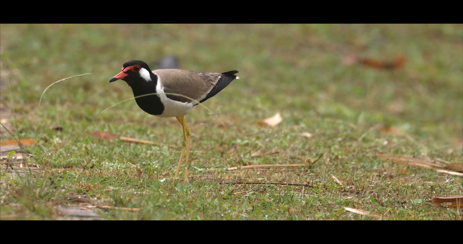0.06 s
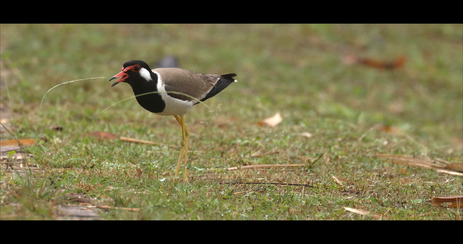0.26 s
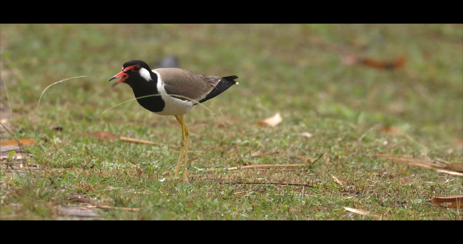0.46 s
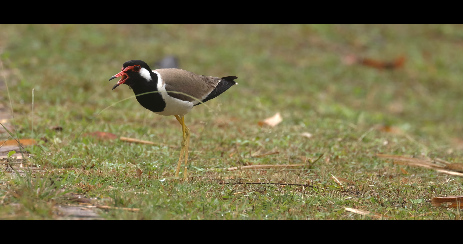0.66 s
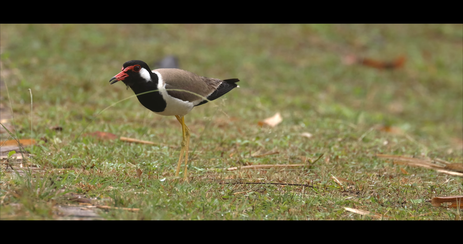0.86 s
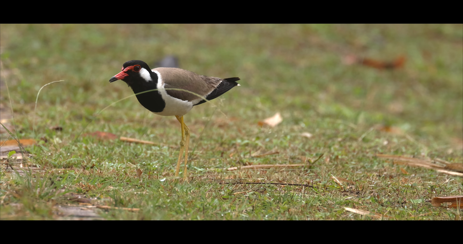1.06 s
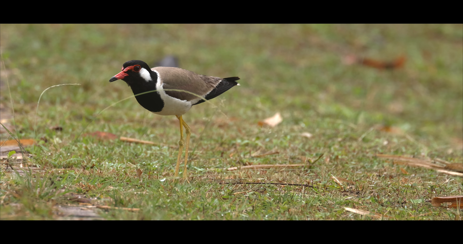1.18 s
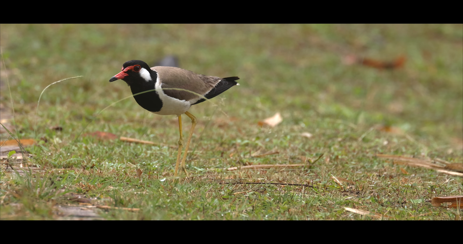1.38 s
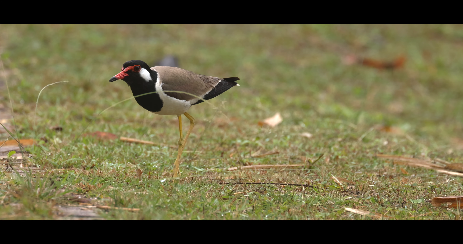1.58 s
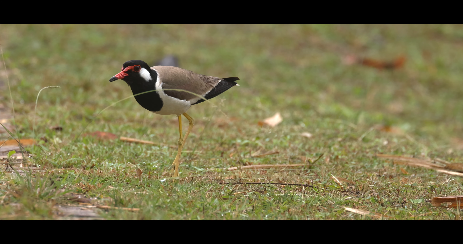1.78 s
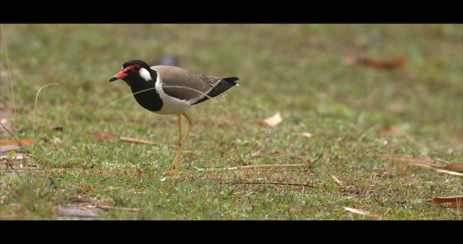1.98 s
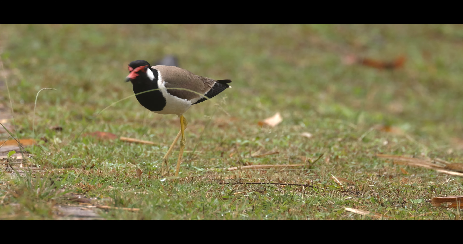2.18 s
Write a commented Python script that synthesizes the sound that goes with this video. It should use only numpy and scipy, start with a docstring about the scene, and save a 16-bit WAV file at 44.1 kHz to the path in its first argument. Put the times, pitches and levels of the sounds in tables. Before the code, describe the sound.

Two lapwings give reedy alarm calls on a lawn. The farther one starts, then the close one cuts in louder, stuttering into a long sagging cry. Faint hoots repeat behind them while light wind buffets the microphone.

```python
"""Two lapwings give alarm calls on a lawn, one close and one farther off. A cry stutters into a reedy
note, a stack of harmonics from the syrinx coloured by the throat, whose pitch arches and sags; the long
ones end in an upward flick. Trees and walls echo them. Behind them a distant bird hoots evenly in nearly
pure tones, and light wind buffets the microphone over a quiet outdoor hush."""
import sys
import numpy as np
from scipy import signal
from scipy.fft import rfft, irfft
from scipy.io import wavfile
from scipy.ndimage import uniform_filter1d

SR = 44100
rng = np.random.default_rng(int(sys.argv[2]) if len(sys.argv) > 2 else 0)


def int16_out(signal):
    """Quantize to a 16-bit WAV file."""
    q = np.round(np.clip(np.atleast_2d(signal).T, -1, 1) * 32767)
    wavfile.write(sys.argv[1], SR, q.astype(np.int16))


N = 99225

# held notes, a three-syllable chatter and the closing flick (time [s], pitch [Hz], level [dB])
NEAR_NOTES = [
    [(.5028, 1412, -24.5), (.521, 1447, -19), (.535, 1404, -21.5), (.550, 1220, -31), (.564, 1127, -34)],
    [(.849, 1420, -20.5), (.859, 1483, -22), (.869, 1477, -20.5), (.882, 1427, -21), (.898, 1240, -28),
     (.908, 1184, -29)],
    [(1.4495, 1344, -26), (1.455, 1396, -22), (1.478, 1369, -23), (1.489, 1280, -26.5)],
    [(1.6525, 1329, -23.5), (1.675, 1358, -24), (1.712, 1366, -23), (1.748, 1352, -24),
     (1.767, 1303, -27.5), (1.785, 1260, -27.5), (1.810, 1154, -28), (1.838, 1040, -31), (1.862, 1002, -38),
     (1.896, 1014, -36.5)],
]
NEAR_CHATTER = [
    [(1.211, 1310, -30), (1.2215, 1300, -30.5)],
    [(1.2275, 1328, -27), (1.240, 1305, -32.5)],
    [(1.240, 1237, -29), (1.248, 1274, -31.5), (1.260, 1218, -30)],
]
NEAR_FLICK = [(1.893, 1213, -38), (1.916, 1265, -35.5), (1.931, 1380, -33), (1.944, 1568, -32),
              (1.951, 1601, -32), (1.959, 1370, -40)]
# stutters that lead into a note (start [s], length [s])
NEAR_PIPS = [(1.3528, 0.0031), (1.3663, 0.0095), (1.3832, 0.009), (1.4002, 0.012), (1.418, 0.011),
             (1.4353, 0.013), (1.5887, 0.0064), (1.6037, 0.011), (1.6208, 0.013), (1.637, 0.012)]
# throat and beak colour of each kind of call (frequency [Hz], gain [dB])
NEAR_THROAT = [(1000, -17.5), (1400, -24.5), (2000, 2), (2750, -0.5), (3150, -2.5), (4250, -3.5),
               (5400, -3.5), (6100, -17.5), (6800, -13.5), (7250, -9), (8200, -27), (9500, -30),
               (13700, -30), (15500, -30.5)]
CHATTER_THROAT = [(1300, -18.5), (2550, -3.5), (3850, 1), (5200, -4), (6500, -22), (8000, -33),
                  (11000, -27), (15500, -31.5)]
FLICK_THROAT = [(1250, -14), (2500, 1.5), (3150, -1), (3800, -18), (4750, -4), (5600, -41.5)]
# overtones that stand out at any pitch (harmonic [number], boost [dB])
FLICK_OVERTONES = [(8, 14), (10, 6.1)]


def near_lapwing():
    """The close bird, dry: reedy notes, slightly brighter pips, a thin chatter and an upward flick."""
    notes = syrinx(NEAR_NOTES, NEAR_THROAT)
    pips = syrinx(stutter(NEAR_PIPS, NEAR_NOTES), NEAR_THROAT, bright_db=0.5)
    chatter = syrinx(NEAR_CHATTER, CHATTER_THROAT)
    flick = syrinx([NEAR_FLICK], FLICK_THROAT, overtones=FLICK_OVERTONES)
    return notes + pips + chatter + flick


# short calls, one long cry and its closing flick (time [s], pitch [Hz], level [dB])
FAR_SHORT_NOTES = [
    [(.198, 1331, -42), (.213, 1353, -39), (.239, 1134, -41.5)],
    [(.369, 1336, -43), (.384, 1329, -39.5), (.403, 1190, -41)],
    [(.497, 1387, -36), (.522, 1418, -34), (.552, 1320, -39.5)],
]
FAR_LONG_NOTES = [
    [(.653, 1381, -31.5), (.695, 1369, -31), (.735, 1374, -30.5), (.775, 1336, -32.5), (.805, 1269, -32),
     (.836, 1199, -29.5), (.862, 1106, -33.5), (.895, 1037, -33), (.924, 1069, -34)],
]
FAR_FLICK = [(.921, 1417, -32.5), (.934, 1533, -34.5), (.944, 1440, -45)]
# stutters that lead into a note (start [s], length [s])
FAR_PIPS = [(.353, 0.012), (.469, 0.0087), (.482, 0.015), (.627, 0.0072), (.6395, 0.01)]
# throat and beak colour of each kind of call (frequency [Hz], gain [dB])
FAR_SHORT_THROAT = [(1350, -3), (2600, 3.5), (4000, 1), (5400, 2), (8100, -9.5), (9500, -22),
                    (15500, -18.5)]
FAR_LONG_THROAT = [(1050, -14), (1370, -7), (2200, 1.5), (2750, 1.5), (4300, -10.5), (5500, 1.5),
                   (6500, -15), (7700, -10), (9600, -28.5), (15500, -33)]
FAR_FLICK_THROAT = [(1500, -1), (12000, -34)]
# overtones that stand out at any pitch (harmonic [number], boost [dB])
FAR_LONG_OVERTONES = [(8, 9), (11, 11), (12, 14)]
FAR_RASP_DB, FAR_PIP_DB = -21.5, -4.5


def far_lapwing():
    """The mate, whose raspy short calls waver on their way. Returns (whole voice, short calls alone)."""
    short = syrinx(FAR_SHORT_NOTES, FAR_SHORT_THROAT, rasp_db=FAR_RASP_DB, flutter_db=3)
    pip_notes = stutter(FAR_PIPS, FAR_SHORT_NOTES + FAR_LONG_NOTES)
    pips = undb(FAR_PIP_DB) * syrinx(pip_notes, FAR_SHORT_THROAT, rasp_db=FAR_RASP_DB)
    cry = syrinx(FAR_LONG_NOTES, FAR_LONG_THROAT, dull=0.13, overtones=FAR_LONG_OVERTONES)
    flick = syrinx([FAR_FLICK], FAR_FLICK_THROAT)
    return short + pips + cry + flick, short


ATTACK_S, RELEASE_S = 0.0012, 0.0019
PITCH_JITTER, SHIMMER_DB = 0.0021, 1


def syrinx(notes, throat, bright_db=0, rasp_db=-34.5, dull=0.036, flutter_db=1.14, overtones=()):
    """A slightly unsteady harmonic stack, shaped by the throat, with a little rasp round each partial."""
    out = np.zeros(N)
    boost_db = {round(k): db for k, db in overtones}
    for note in notes:
        times, pitch, db = np.array(sorted(note), float).T
        t = np.arange(times[0], times[-1], 1 / SR)
        n = len(t)
        glide = uniform_filter1d(np.interp(t, times, pitch), size=120, mode="nearest")
        hz = glide * (1 + PITCH_JITTER * wobble(514, n))
        phase = 2 * np.pi * np.cumsum(hz) / SR
        sag_hz = np.maximum.accumulate(hz) - hz
        tilt = bright_db - dull * sag_hz  # dB per octave: the note darkens as it sags
        voice = np.zeros(n)
        for k in range(1, 15):
            partial_db = colour_db(k * hz, throat) + boost_db.get(k, 0) + tilt * np.log2(max(k / 2, 1))
            partial_db += flutter_db * wobble(113, n)
            rasp = undb(rasp_db) * np.sqrt(k) * (wobble(1400, n) + 1j * wobble(1400, n))
            partial = np.real((1 + rasp) * np.exp(1j * k * phase))
            voice += undb(partial_db) * partial * (k * hz < SR / 2)
        gate = np.clip((t - times[0]) / ATTACK_S, 0, 1) * np.clip((times[-1] - t) / RELEASE_S, 0, 1)
        level_db = np.interp(t, times, db) + SHIMMER_DB * wobble(207, n)
        add(out, times[0], voice * gate * undb(level_db))
    return out


FULL_PIP_S, PIP_SHARP, PIP_DB = 0.01417, 0.0087, -0.5  # a full pip: a touch above its note, and softer
PIP_FLAT_PER_S, PIP_DB_PER_S = 8.4, 608  # a shorter pip is flatter and weaker
PIP_ARCH, PIP_SCOOP = 0.054, 0.23  # each scoop's share of the pitch and of the length


def stutter(pips, notes):
    """Pip curves: each scoops up to about the pitch and level of the note ahead, then drops away."""
    curves = []
    for start, length in pips:
        _, hz, db = min(note[1] for note in notes if note[1][0] > start)
        shortfall_s = max(FULL_PIP_S - length, 0)
        hz = hz * (1 + PIP_SHARP - PIP_FLAT_PER_S * shortfall_s)
        db = db + PIP_DB - PIP_DB_PER_S * shortfall_s
        end, scoop_s = start + length, length * PIP_SCOOP
        low_hz = hz * (1 - PIP_ARCH)
        curves.append([(start, low_hz, db), (start + scoop_s, hz, db),
                       (end - scoop_s, hz, db), (end, low_hz, db)])
    return curves


# slaps off walls and trees (delay [s], level [dB])
SLAP_ECHOES = [(.0052, -23.5), (.029, -29), (0.046, -25.5)]
# EQ on the close bird's reverb send (frequency [Hz], gain [dB])
NEAR_SEND_EQ = [(2800, 1.5), (4200, -1.5), (7000, 1)]
# a cry of which only the echo arrives (time [s], pitch [Hz], level [dB])
ECHOED_CRY = [(0, 1380, -42.5), (.025, 1326, -56), (.06, 1010, -40)]
WALL_DELAY_S, WALL_DB = 0.021, -11  # the far bird's short calls bounce strongly off a wall
NEAR_SEND_DB, FAR_SEND_DB = -12, -5.5


def lapwings():
    """Both birds on the lawn, with distinct echoes and a diffuse tail; the far one is wetter."""
    near = near_lapwing()
    far, far_short = far_lapwing()
    out = near + far
    for delay, db in SLAP_ECHOES:
        add(out, delay, undb(db) * (near + far))
    add(out, WALL_DELAY_S, undb(WALL_DB) * far_short)
    near_tail = undb(NEAR_SEND_DB) * foliage_reverb(equalise(near, NEAR_SEND_EQ))
    far_tail = foliage_reverb(undb(FAR_SEND_DB) * far + syrinx([ECHOED_CRY], FAR_SHORT_THROAT))
    return out + near_tail + far_tail


BODY_T60_S, TREBLE_T60_S, BUILD_S = 0.74, 0.5, 0.0019
CROSSOVER_HZ, TREBLE_DB = 5140, 3


def foliage_reverb(x):
    """Diffuse echo from the foliage; the treble dies sooner."""
    t = np.arange(SR) / SR
    body = signal.sosfilt(signal.butter(2, CROSSOVER_HZ, fs=SR, output="sos"), rng.standard_normal(SR))
    highpass = signal.butter(2, CROSSOVER_HZ, "high", fs=SR, output="sos")
    treble = undb(TREBLE_DB) * signal.sosfilt(highpass, rng.standard_normal(SR))
    body_decay, treble_decay = undb(-60 * t / BODY_T60_S), undb(-60 * t / TREBLE_T60_S)
    build = 1 - np.exp(-t / BUILD_S)
    tail = build * (body * body_decay + treble * treble_decay)
    return signal.fftconvolve(x, tail / np.linalg.norm(build * body_decay))[:N]


# cues for the two-note hoots (start [s])
HOOT_STARTS = [.015, .452, .89, 1.325, 1.773, 2.205]
# the notes of one hoot (delay [s], length [s], pitch [Hz], level [dB])
HOOT_NOTES = [(0, 0.031, 850, -45.5), (0.026, 0.0435, 1012, -48)]
HOOT_RISE, HOOT_SEND_DB = 0.12, -14


def distant_bird():
    """Soft, nearly pure hoots: a low note and then a higher one, each sliding upward."""
    out = np.zeros(N)
    for start in HOOT_STARTS:
        for delay, length, hz, db in HOOT_NOTES:
            progress = np.linspace(0, 1, int(length * SR))
            phase = 2 * np.pi * np.cumsum(hz * (1 + HOOT_RISE * (progress - .5))) / SR
            add(out, start + delay, undb(db) * np.sin(np.pi * progress) * np.sin(phase))
    return out + undb(HOOT_SEND_DB) * foliage_reverb(out)


# peaks of the wind buffets (time [s], level [dB])
GUSTS = [(.365, -46), (.485, -50), (.60, -47.5), (.72, -46.5), (0.871, -38), (1.0, -37), (1.11, -43.5),
         (1.292, -45.5), (1.46, -40.5), (1.83, -40), (1.943, -35), (2.25, -45.5)]
# their rumbling colour (frequency [Hz], gain [dB])
WIND_COLOUR = [(20, -27), (60, -2), (115, -4.5), (200, -6.5), (900, -52)]
GUST_WIDTH_S = 0.036
THUMP_S, THUMP_HZ, THUMP_WIDTH_S, THUMP_DB = 0.99, 98, 0.0039, -18.5


def wind():
    """Low buffets on the microphone and one sharp thump."""
    t = np.arange(N) / SR
    swell = sum(undb(db) * np.exp(-.5 * ((t - peak) / GUST_WIDTH_S) ** 2) for peak, db in GUSTS)
    thump_envelope = np.exp(-.5 * ((t - THUMP_S) / THUMP_WIDTH_S) ** 2)
    thump = -thump_envelope * np.cos(2 * np.pi * THUMP_HZ * (t - THUMP_S))
    return swell * noise(WIND_COLOUR) + undb(THUMP_DB) * thump


# colour of the outdoor bed (frequency [Hz], gain [dB])
HUSH_COLOUR = [(20, -19), (130, 5.5), (300, -3), (600, -5), (2500, -5.5), (3500, -8.5), (7000, -19.5),
               (10000, -27.5), (16000, -32.5)]
HUSH_DB = -46


def hush():
    """A quiet bed of outdoor noise whose level wavers gently."""
    return noise(HUSH_COLOUR) * undb(HUSH_DB + .5 * wobble(4.04, N))


def undb(db):
    """Decibels to gain."""
    return 10 ** (np.asarray(db) / 20)


def colour_db(hz, curve):
    """Read an EQ curve on a log-frequency axis."""
    freqs, db = np.array(curve).T
    return np.interp(np.log(np.maximum(hz, 1)), np.log(np.sort(freqs)), db)


def equalise(x, curve):
    """Shape a sound with an EQ curve."""
    gain = undb(colour_db(np.fft.rfftfreq(2 * N, 1 / SR), curve))
    return irfft(rfft(x, 2 * N) * gain)[:N]


def noise(curve):
    """Noise of the given colour, rms 1."""
    gain = undb(colour_db(np.fft.rfftfreq(N, 1 / SR), curve))
    y = irfft(rfft(rng.standard_normal(N)) * gain, N)
    return y / y.std()


def wobble(rate_hz, size):
    """Smooth random modulation with a spread near 1."""
    return np.interp(np.arange(size) / SR * rate_hz, np.arange(2048), rng.standard_normal(2048))


def add(out, start_s, y):
    """Mix a sound in at its time."""
    i = max(int(start_s * SR), 0)
    out[i:i + len(y)] += y[:max(N - i, 0)]


def scene():
    """Lapwings in front, the distant bird and the wind behind, all over the hush; mono."""
    bed = hush()
    return (lapwings() + distant_bird() + wind() + bed)[None]


def record(dry):
    """A steep low-pass cuts the top at 16 kHz."""
    return signal.sosfilt(signal.ellip(10, .1, 80, 16000, fs=SR, output="sos"), dry)


dry = scene()
out = record(dry)
int16_out(out)
```